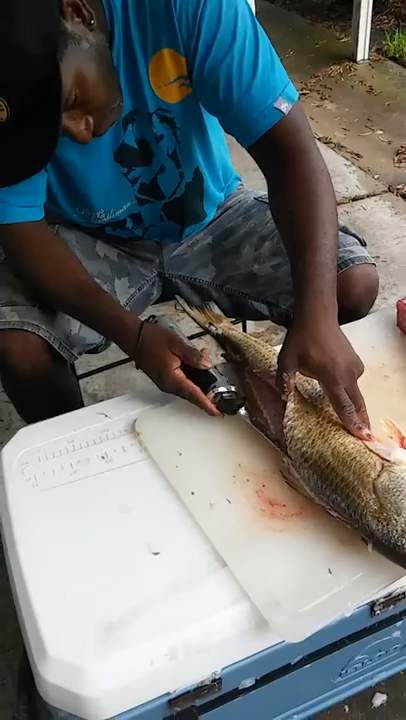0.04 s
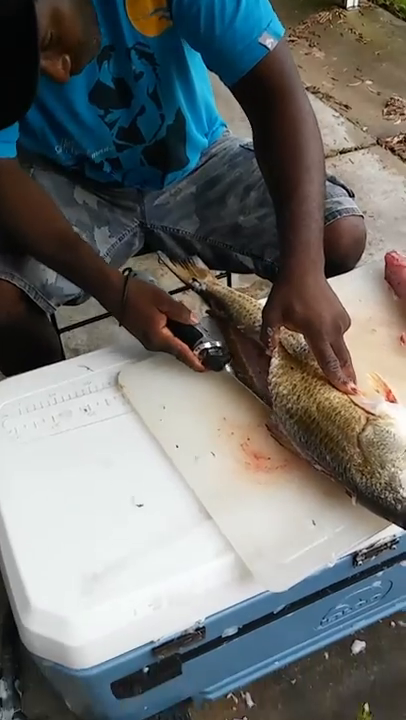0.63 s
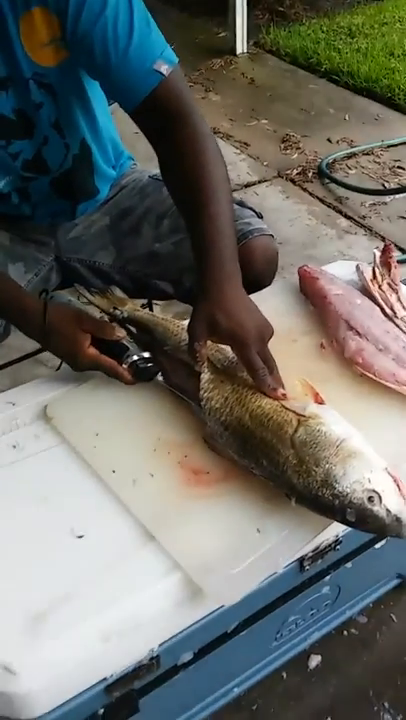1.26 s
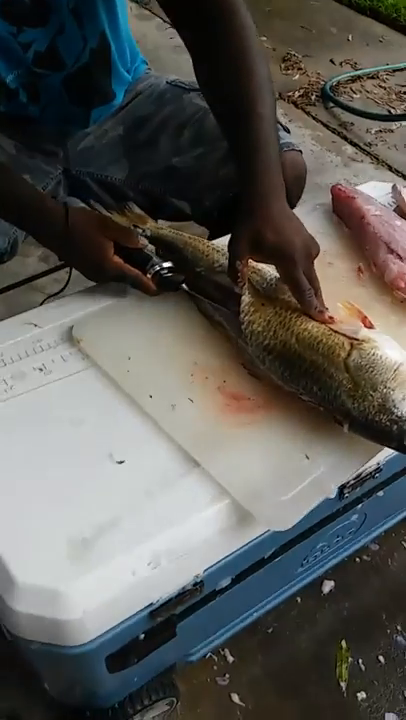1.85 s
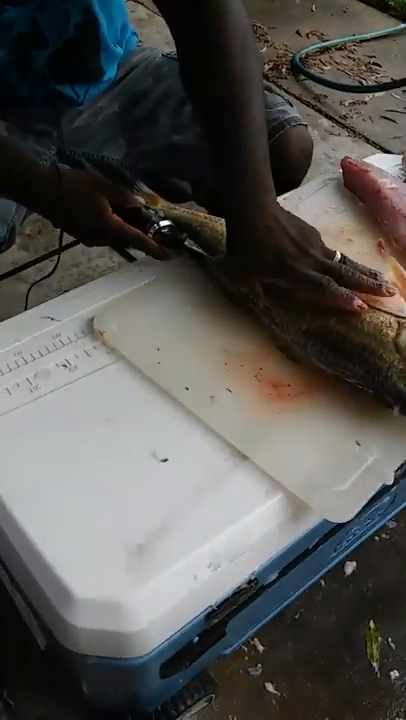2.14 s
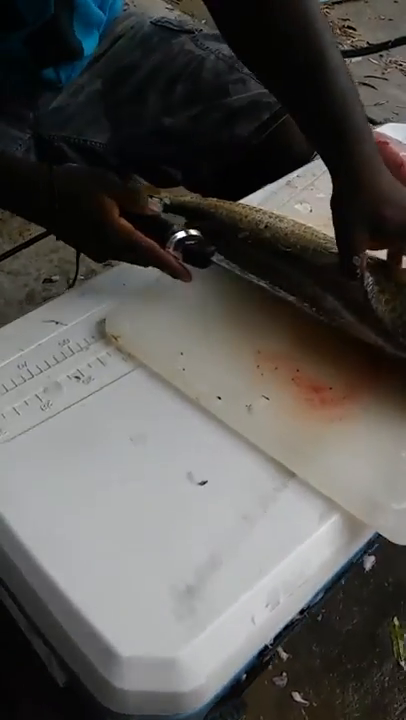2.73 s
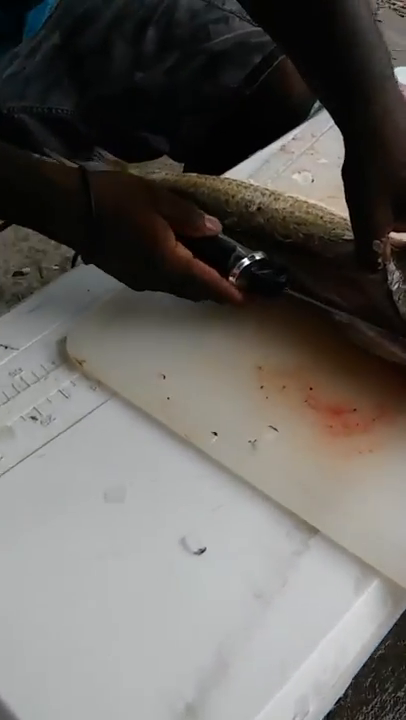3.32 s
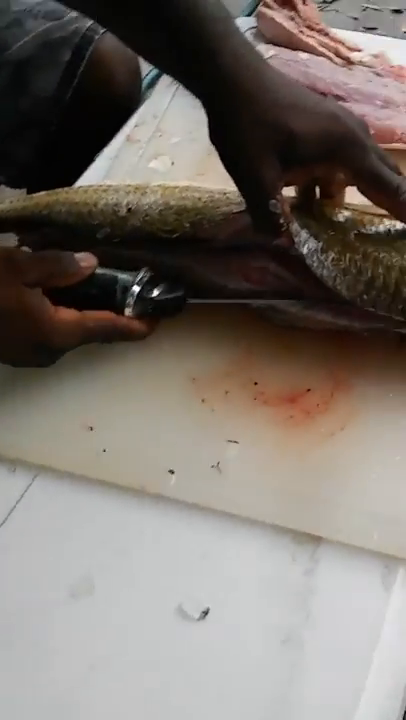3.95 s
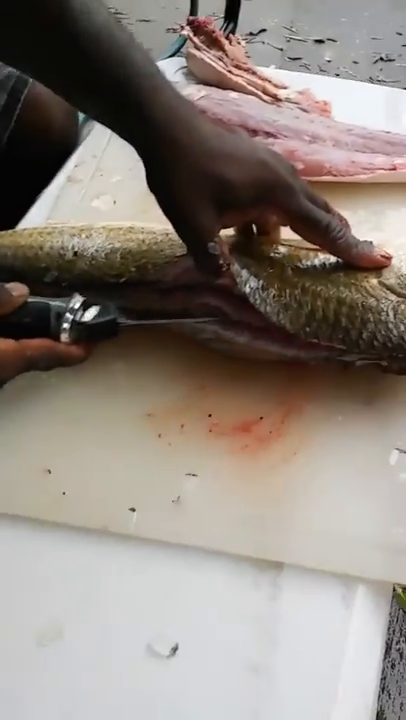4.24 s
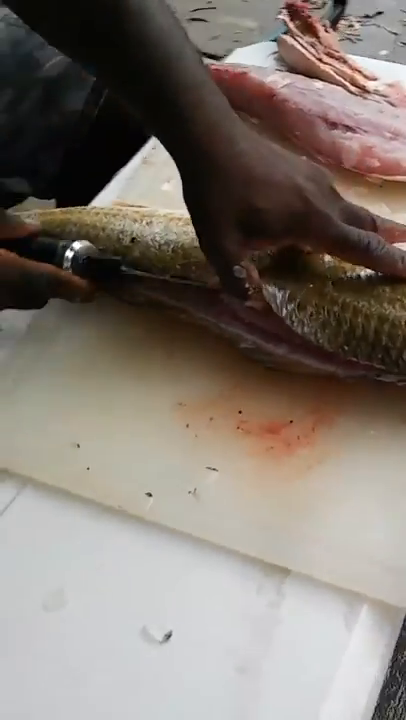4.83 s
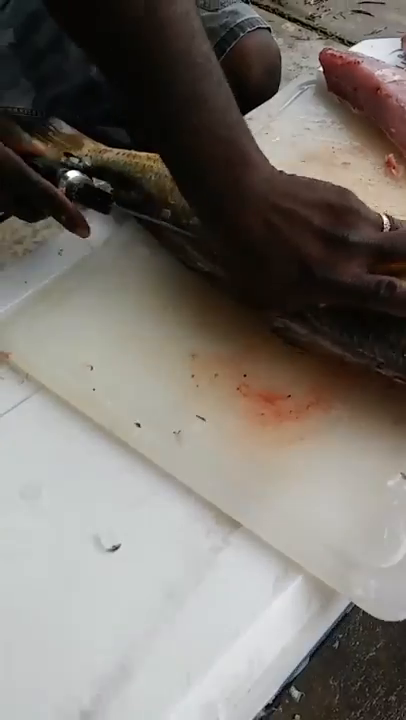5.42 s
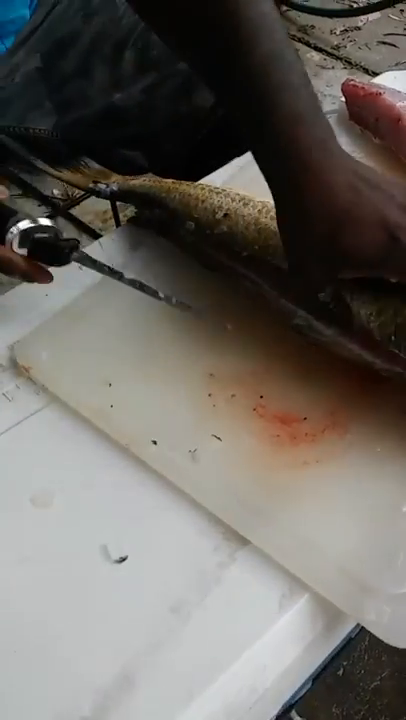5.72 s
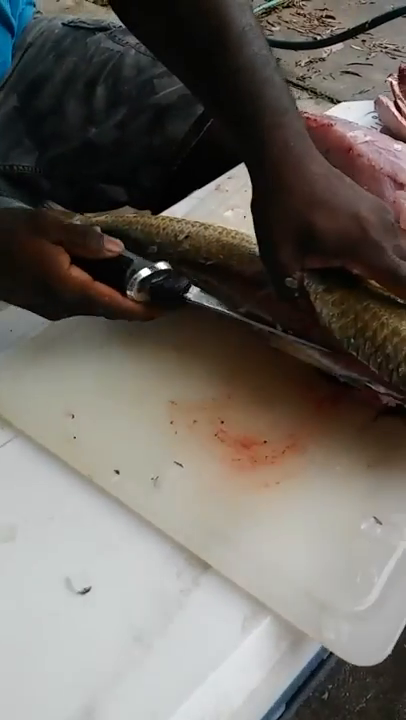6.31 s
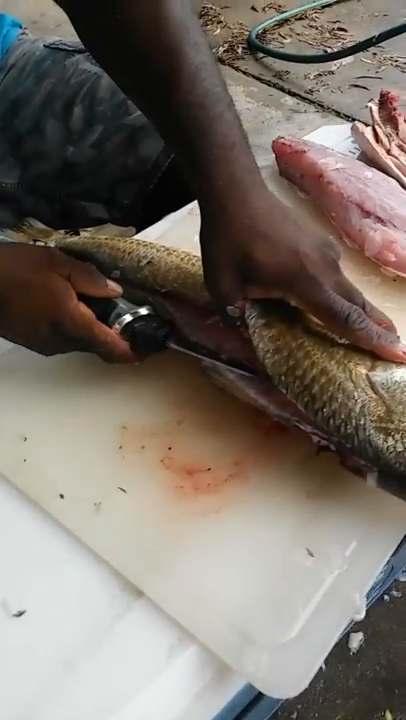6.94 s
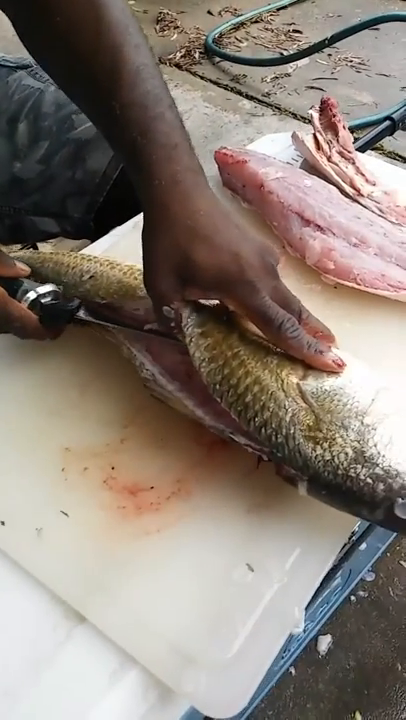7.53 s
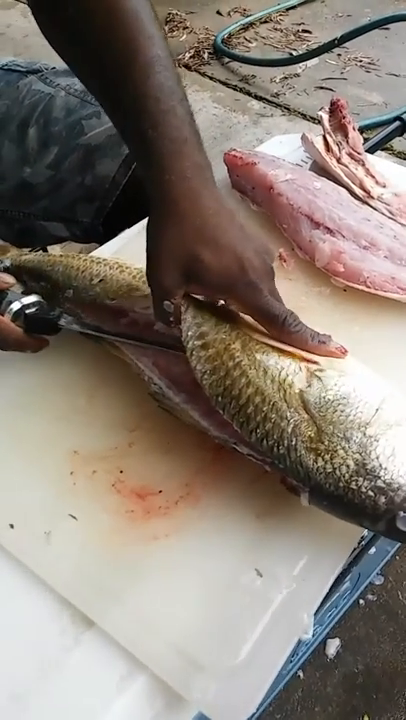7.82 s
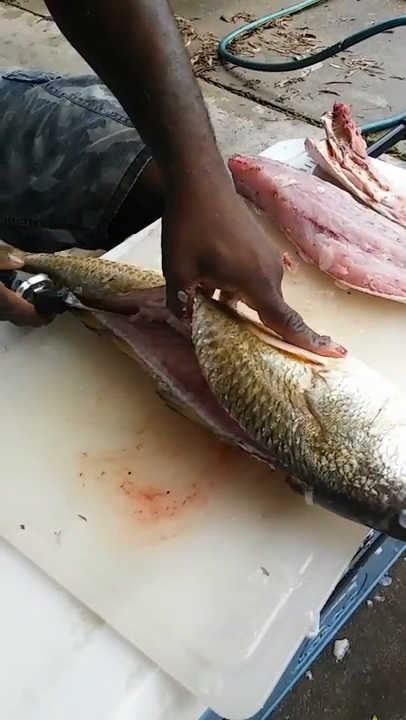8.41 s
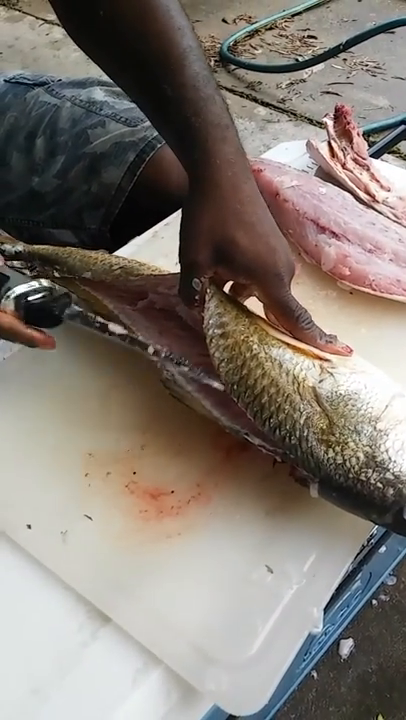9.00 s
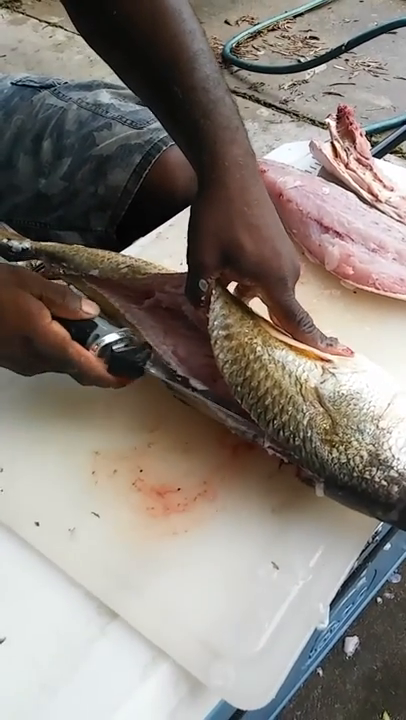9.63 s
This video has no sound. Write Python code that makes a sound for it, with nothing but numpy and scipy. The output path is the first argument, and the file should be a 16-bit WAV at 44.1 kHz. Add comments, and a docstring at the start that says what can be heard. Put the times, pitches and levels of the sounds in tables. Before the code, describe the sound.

Close by, an electric knife spins up and cuts a fish, its steel blades clattering and thumping a plastic board over grinding gears. It buzzes in three bursts, each coasting down, and the last speeds up midway. In the pauses come wet crackles, ticking scales, a small squeak and a sharp bump on the board. A low outdoor rumble and faint drone lie underneath.

```python
"""An electric fillet knife cuts a fish on a plastic board outdoors, over a low rumble and drone. Wet handling
and faint chirps come first. At 0.5 s the motor spins up: at each reversal the twin blades clatter, shake the
housing and thump the board; gears grind in between. It coasts down, scales tick, steel squeaks on skin and the
knife handle bumps the lid. A second cut starts at 3.8 s; a wet pop, ticks and crackles follow. The third starts
at 6.8 s, speeds up and coasts down; the motor kicks again at the very end."""
import sys
import numpy as np
from scipy import signal
from scipy.fft import rfft, irfft
from scipy.io import wavfile
from scipy.ndimage import uniform_filter1d

SR = 44100
rng = np.random.default_rng(int(sys.argv[2]) if len(sys.argv) > 2 else 0)


def dump(signal):
    """Clip the signal to [-1, 1] and save it as 16-bit WAV at the path in sys.argv[1]."""
    limited = np.clip(np.atleast_2d(signal).T, -1, 1)
    pcm = np.round(limited * 32767).astype(np.int16)
    wavfile.write(sys.argv[1], SR, pcm)


N = 426006

# Motor runs. Each row: trigger press and release in seconds, first and full stroke rate in Hz,
# creep in Hz/s, spin-up and drag time constants in seconds, friction in Hz/s.
MOTOR_RUNS = [(.484, 2.105, 20.2, 61.123, -.741, .1635, 2.061, 28.66),
              (3.7514, 4.881, 23.5, 58.55, 3.804, .1693, .5963, 6.7),
              (6.7613, 8.671, 20.53, 64.388, -3.389, .2096, 1.3125, 15.69)]
# Base levels per run. Each row: blade, housing and board level in dB.
RUN_LEVELS_DB = [(-32.5, -32, -44.5), (-29, -28.5, -36.5), (-24, -30.5, -37.5)]
# Strongest modes per run. Each row: blade level and its change after release in dB, housing pitch in Hz,
# housing level in dB, board pitch pressed and free in Hz, board level in dB, board decay in seconds.
RUN_MODES = [(-4.5, 0, 2600, -3.5, 900, 865, -3, .005), (-4.5, -1, 2330, 0, 750, 900, -5.5, .0018),
             (-2.5, -8, 2490, -3.5, 830, 680, -11, .0022)]
# Blade mode, shifted by bending and the grip of the flesh. Each row: time in seconds, pitch in Hz.
BLADE_PITCH = [(.5, 4400), (1.3, 4500), (1.9, 4700), (2.15, 4950), (2.65, 4480), (3.8, 4700), (4.6, 4800),
               (4.85, 5150), (5.0, 4550), (5.4, 4850), (6.8, 4550), (7.3, 4600), (7.7, 4900), (8.4, 4700),
               (8.8, 4900), (9.401, 4750)]
# Blades bite on bone and scales; the last row hushes them as the motor stalls.
# Each row: centre and half length in seconds, blade, housing and board gain in dB.
BITES = [(0.89, 0.15, 1.3, 5, 3), (1.59, 0.39, 2, 7.5, 2), (2.53, 0.59, 9, 3, 14),
         (4.336, 0.54, 4.5, 4.5, -0.5), (4.85, 0.091, 6.5, -0.5, 9), (4.998, 0.097, 2.5, 0, 6),
         (5.179, 0.18, 4, 1.7, 8.5), (5.38, 0.063, -0.5, 5.5, 3.5), (7.865, 0.25, 6.5, 4.5, 6),
         (8.602, 0.056, 5, 3, 1.5), (8.968, 0.24, 4, 7.5, 5), (9.446, 0.36, 4.5, 11.5, 10),
         (9.562, 0.021, -10, -9, 7)]
# Responses per run; they shift with grip and cut depth. Each row: frequency in Hz, gain in dB.
BLADES_1 = [(1880, -44), (3200, -8.5), (3660, -6), (4630, 2.5), (5750, -1.5), (6360, -2.5), (6990, -5.5),
            (8160, -5.5), (9530, -17), (13300, -14), (14300, -21), (15500, -39), (16000, -44)]
BLADES_2 = [(1880, -35), (3200, -23.5), (3970, -6.5), (4420, 1.5), (5630, -0.5), (6490, -3), (7630, -4.5),
            (8910, -12.5), (10600, -20.5), (13300, -16), (15000, -32), (16000, -66)]
BLADES_3 = [(1880, -56), (3200, -21), (3640, -13), (4450, 2), (4760, 1), (5270, -0.5), (5750, -5),
            (7580, -6.5), (10100, -26), (13300, -18.5), (15100, -39), (16000, -45)]
HOUSING_1 = [(650, -48), (1100, -25), (1280, -29), (1470, -3), (1620, -14.5), (1750, -13), (1940, -6),
             (2120, -6), (2550, 2.5), (2870, -2.5), (3700, -13.5), (4810, -15), (8140, -120)]
HOUSING_2 = [(650, -60), (1100, 1), (1170, 2), (1320, -17), (1420, 3.5), (1500, 2), (1690, -6.5),
             (1890, 4.5), (2050, -2), (2230, 1), (2770, 5), (3230, -4), (3700, -5), (4810, -3.5),
             (8140, -120)]
HOUSING_3 = [(650, -16.5), (1100, -54), (1290, -4.5), (1510, -2.5), (1680, -4), (2070, -3.5), (2430, 2.5),
             (3190, -1), (3700, -5), (4810, -6.5), (8140, -120)]
BOARD_1 = [(190, -84), (330, -11.5), (377, -26), (438, -15.5), (655, -21.5), (749, -8.5), (885, -4),
           (1100, -17.5), (1250, -14), (1620, -12), (2750, -120)]
BOARD_2 = [(190, -52), (330, -13), (357, -23), (527, -3), (659, -1.5), (774, 3), (1000, -2.5), (1160, -8.5),
           (1250, -4.5), (1620, -22), (2750, -120)]
BOARD_3 = [(190, -22), (330, -26), (377, -6.5), (570, -7.5), (623, -1), (805, 0.5), (920, 2), (1100, -2),
           (1250, -6.5), (1620, -20), (2750, -120)]
# Spectra of the other sounds. Each row: frequency in Hz, gain in dB.
LOOSE_HOUSING = [(650, -40), (1170, -30), (1440, -4), (1750, -10), (2200, 1), (2750, 0), (3400, -6),
                 (4700, -7), (8140, -120)]
TICK_COLOUR = [(3000, -41), (6000, 6), (8000, 0.5), (10000, -0.5), (13000, -2.5), (14500, -14), (16000, 1)]
SIZZLE_COLOUR = [(6000, -43), (11000, -10.5), (13300, 6), (15000, -9), (16000, -26.5)]
CLUNK_COLOUR = [(300, -15), (650, -3), (850, -14), (1120, 0), (1400, 0), (1900, 1), (2350, -9), (3100, 0),
                (4600, -6), (6000, -12), (7400, -12), (12900, -24), (15500, -28)]
POP_COLOUR = [(530, -64), (900, -32), (1010, -34), (1180, -23), (1410, -4), (2160, 1), (3000, -7),
              (4500, -44), (5850, -70), (9900, -120)]
RUB_COLOUR = [(200, -32), (400, -12.5), (640, 5), (950, -5), (1350, -2.5), (1800, -8.5), (2300, -8.5),
              (3400, -15.5), (7000, -16), (12000, -24), (16000, -26.5)]
RUMBLE_COLOUR = [(15, -67), (25, -57), (55, -14.5), (236, -1.5), (354, -8.5), (476, -9), (560, -13.5),
                 (911, -19), (1020, -17), (1370, -33), (1560, -21.5), (1840, -34.5), (2000, -24),
                 (12200, -50), (16000, -80)]
# Single knocks, hard strokes and motor starts; the last two are the motor kicking in again.
# Each row: start in seconds, relative blade, housing, board and ping level in dB, contact T60 in seconds.
KNOCKS = [(.484, -40, -37, -33.5, -38, 0.034), (1.363, -20.5, -20, -46, -19, 0.011),
          (2.475, -36, -41, -54, -19, .017), (2.635, -25, -48, -60, -12, .027),
          (2.702, -33, -51, -55, -19, 0.016), (2.94, -26.5, -46, -52, -21, 0.025),
          (3.057, -34, -58, -51, -32, 0.015), (3.124, -36.5, -46, -48, -28, .028),
          (3.225, -40, -60, -45, -33, .02), (3.286, -58, -58, -44.5, -45, 0.058),
          (3.627, -47, -52, -41, -34, .021), (3.675, -32.5, -58, -51, -34, 0.0064),
          (3.743, -32, -41, -48, -30, 0.031), (3.751, -26.5, -30.5, -29, -20, 0.024),
          (4.806, -26, -21, -26, -14, .013), (4.837, -26, -26, -29, -9, 0.012),
          (4.995, -32, -34, -33, -20, .016), (5.035, -25, -22, -35, -7, .016),
          (5.372, -34.5, -44, -36, -32, 0.082), (5.459, -33, -33, -44, -25, 0.049),
          (5.7, -38, -38, -63, -34, 0.012), (5.784, -38.5, -43.5, -67, -40, 0.02),
          (5.924, -46.5, -55, -61, -45, 0.037), (6.294, -68, -66, -41, -70, 0.026),
          (6.457, -39, -64, -61, -25, .019), (6.572, -30, -70, -53, -22, 0.025),
          (6.654, -35, -46, -41, -16.5, .024), (6.706, -32, -57, -54, -34, .013),
          (6.757, -35, -35, -27.5, -24, .021), (7.645, -16, -41, -36.5, -3, 0.016),
          (7.753, -18, -34, -42, -4, .018), (8.095, -20, -26, -44, -12, .016),
          (8.549, -19, -30, -38, -11, .013), (8.595, -22, -28, -38, -10, .01),
          (9.044, -23, -24.5, -41, -10, .015), (9.221, -29, -34, -52, -18, 0.018),
          (9.394, -23, -27, -42, -20, .031), (9.532, -20.5, -34, -55, -20, 0.0054),
          (9.623, -35, -39, -40, -36, 0.11), (9.653, -29.5, -33, -31.5, -26, .033)]
# Bright ticks of scales and of the snapping blade, and wet pops. Each row: start in seconds, relative level in
# dB.
SCALE_TICKS = [(3.246, -22), (3.286, -25), (3.2984, -31), (3.306, -28), (3.449, -29.5), (3.482, -33),
               (3.6285, -29), (3.674, -20), (5.5563, -24), (5.62, -27), (5.756, -25.5), (6.039, -41),
               (6.186, -37), (6.4582, -25), (6.572, -24)]
POPS = [(5.7436, -19.5)]
# Gliding tones. Each row: centre and half length in seconds, pitch in Hz, glide in Hz/s, level in dB.
RASPS = [(4.67, .1, 520, 400, -39), (8.6, .055, 4700, -7000, -20.5), (8.81, .07, 2780, -1500, -31),
         (8.97, .1, 2300, -2500, -28.5)]
WHINES = [(.85, 0.32, 4400, -0.5, -45), (1.0, 0.34, 6300, 2, -40.5), (1.4, 0.38, 1507, 42, -43),
          (5.03, 0.24, 1470, -0.5, -38.5), (4.36, 0.28, 1187, 151.5, -37), (7.45, 0.34, 11000, -1, -45)]
DRONES = [(1.8, 1, 224, 10.5, -49), (3.54, 0.35, 257.2, 0, -45.5), (6.2, 0.52, 170, 0, -53.5),
          (3.8, 0.44, 150, 0.5, -52.5), (9.5, 0.87, 140, 0, -56.5)]
CHIRPS = [(.11, 0.051, 1370, -2000, -44.5), (.215, 0.042, 1330, 996, -46), (.27, 0.043, 2270, -3000, -49),
          (.37, .018, 1320, -4, -49)]
# Noise swells. Each row: centre and half length in seconds, relative level in dB.
SIZZLE_SWELLS = [(1.0, .2, -46), (2.25, 0.2, -47), (4.95, .14, -49), (7.85, 0.34, -37), (8.6, 0.094, -37),
                 (8.88, 0.16, -39)]
HANDLING_SWELLS = [(.1, 0.15, -53), (.42, 0.16, -38), (3.42, 0.1, -60), (3.65, 0.11, -38.5),
                   (5.14, 0.05, -25), (5.55, 0.17, -69), (5.89, 0.041, -42), (6.38, 0.13, -55)]
RUMBLE_SWELLS = [(.1, 0.5, -41), (1.3, 0.99, -45), (3.55, 0.35, -49), (4.8, 1, -49), (5.95, 0.21, -54.5),
                 (6.9, 0.51, -56)]

STALL_HZ, REFERENCE_HZ = 11, 60  # stroke rates: blades stick; base levels hold
SPEED_DB_PER_OCTAVE, EASE_DB_PER_S = (5.5, 7, -0.5), (5, 10.5, 28.5)  # blades, housing, board


def knife(bite_db, run, levels_db, modes, blades, housing, board, relax_s=0.28):
    """One run: clatter and grinding drive blades, housing and board; the hand eases off after release."""
    (blade_mode_db, blade_damp_db, housing_hz, housing_mode_db,
     pressed_hz, free_hz, board_mode_db, board_decay_s) = modes
    rate_hz, coast_s = motor(*run)
    strokes = np.cumsum(rate_hz) / SR
    octaves = np.log2(np.maximum(rate_hz, STALL_HZ) / REFERENCE_HZ)
    loose_db = -2 - 0.59 * bite_db[0]  # a bite tightens the clatter and lessens the grinding
    relaxed = 1 - np.exp(-coast_s / relax_s)
    # Steel answers at once; housing and board take longer.
    clack = clatter(rate_hz, loose_db, spread=.135, scatter_db=.9, limp_db=1, decay_s=.0009, count=18)
    ping = clatter(rate_hz, loose_db, spread=.09, scatter_db=.8, limp_db=.8, decay_s=.0014, count=5)
    shake = clatter(rate_hz, loose_db, spread=.19, scatter_db=1.1, limp_db=2, decay_s=.0008, count=9)
    sway = clatter(rate_hz, loose_db, spread=.15, scatter_db=1.2, limp_db=1,
                   decay_s=board_decay_s, count=9)
    touch = clatter(rate_hz, loose_db, spread=.13, scatter_db=3.8, limp_db=1.8, decay_s=.0003, count=2)
    grind = gears(rate_hz)
    grind_gain = undb(loose_db + 3.5 * octaves * (coast_s > 0))
    running = uniform_filter1d(1. * (rate_hz > 0), size=200) * judder()

    def part(hits, colour, level_db, grind_db, mode=0, mode_gain=0, loose_colour=None):
        """Contacts and grinding rattle one part; its mode rings on top."""
        grind_share = (grind_gain * undb(grind_db)) ** 2
        force = np.sqrt(hits + grind_share * grind) * rng.standard_normal(N)
        rattle = resonate(force, colour)
        if loose_colour is not None:
            rattle = (1 - relaxed) * rattle + relaxed * resonate(force, loose_colour)
        norm = np.sqrt(1 + grind_share + mode_gain ** 2)
        return (rattle + mode_gain * mode) / norm * undb(level_db) * running

    blade_db, housing_db, board_db = (
        base + rise * octaves - ease * coast_s + bite
        for base, rise, ease, bite in zip(levels_db, SPEED_DB_PER_OCTAVE, EASE_DB_PER_S, bite_db))
    blade_hz = np.interp(np.arange(N) / SR, *np.transpose(BLADE_PITCH))
    blade_mode = struck(ping, strokes, blade_hz, detune=.04, uneven_db=1, stray=.028, droop=.3)
    overtone = undb(-11.5) * struck(ping, strokes, hz=6960, detune=.1, uneven_db=7.5, stray=.035)
    blade_ring = undb(blade_mode_db + 0.57 * bite_db[0] + blade_damp_db * relaxed)
    # After release the housing rings lower and weaker, the board hollower.
    sagging_hz = housing_hz * (1 - .14 * relaxed)
    housing_mode = struck(ping, strokes, sagging_hz, detune=.035, uneven_db=1.5, stray=.025)
    housing_ring = undb(housing_mode_db + bite_db[1] - 16 * relaxed)
    board_hz = pressed_hz + (free_hz - pressed_hz) * relaxed
    board_mode = struck(sway, strokes, board_hz, detune=.045, uneven_db=1.5, stray=.04)
    board_ring = undb(board_mode_db + 12.5 * relaxed)

    steel = part(clack, blades, blade_db, grind_db=3.5, mode=blade_mode + overtone, mode_gain=blade_ring)
    shell = part((clack + shake) / 2, housing, housing_db, grind_db=10.5,
                 mode=housing_mode, mode_gain=housing_ring, loose_colour=LOOSE_HOUSING)
    thump = part(sway, board, board_db, grind_db=-4, mode=board_mode, mode_gain=board_ring)
    tick = part(touch, TICK_COLOUR, blade_db - 14, grind_db=-6)  # first touch of steel on steel
    cutting = sizzle(clack + grind / 6) + rasp(ping, strokes, rate_hz)
    return steel + shell + thump + tick + cutting * running


def motor(press_s, release_s, first_hz, full_hz, creep_hz_per_s, spin_up_s, drag_s, friction_hz_per_s,
          surge_s=7.546, surge_rise_s=.25, surge_hz=7.08):
    """Spins up, then coasts against drag and friction. Returns stroke rate and time since release."""
    t = np.arange(N) / SR
    held_s = np.clip(t, press_s, release_s) - press_s
    coast_s = np.maximum(t - release_s, 0)
    surge = np.clip((press_s + held_s - surge_s) / surge_rise_s, 0, 1)  # last run only
    target_hz = full_hz + creep_hz_per_s * held_s + surge_hz * surge
    driven_hz = target_hz + (first_hz - target_hz) * np.exp(-held_s / spin_up_s)
    friction_hz = friction_hz_per_s * drag_s
    rate_hz = (driven_hz + friction_hz) * np.exp(-coast_s / drag_s) - friction_hz
    return rate_hz * ((t >= press_s) & (rate_hz > STALL_HZ)), coast_s


def clatter(rate_hz, loose_db, spread, scatter_db, limp_db, decay_s, count,
            hit_db=5.5, jitter_s=.0004, lead_s=.0012):
    """Power of the blade contacts: a cluster per reversal, longer when slow, tighter when biting."""
    strokes = np.cumsum(rate_hz) / SR
    reversals = np.flatnonzero(np.diff(np.floor(strokes)))[:, None]
    draws = rng.standard_normal((len(reversals), 2 + 2 * count))
    jitter, scatter, offset, strength = np.split(draws, [1, 2, 2 + count], axis=1)
    width_s = spread * undb(0.36 * loose_db[reversals]) / np.maximum(rate_hz[reversals], 26)
    times_s = reversals / SR - lead_s + jitter_s * jitter + width_s * offset
    share = undb(hit_db * strength) ** 2 * np.exp(-offset ** 2 / 2)
    share /= share.sum(axis=1, keepdims=True)
    limp = -(-1) ** np.arange(len(reversals))[:, None]  # every second stroke hits harder
    size = undb(scatter_db * scatter + limp_db * limp) ** 2
    return impacts(times_s, size / size.mean() * share / rate_hz[reversals], decay_s)


def struck(power, strokes, hz, detune, uneven_db, stray, droop=0):
    """A mode rung by the contacts; each stroke has its own pitch and strength, and may droop."""
    draws = rng.standard_normal((N // 500, 2))[np.floor(strokes + 1 / 3).astype(int)]
    size = undb(uneven_db * draws[:, 1]) / undb(uneven_db ** 2 * np.log(10) / 20)  # mean square 1
    stroke_phase = np.clip((strokes + 1 / 3) % 1 - 1 / 3, -1 / 6, 1 / 3)
    pitch_hz = hz * (1 + detune * draws[:, 0] - droop * stroke_phase)
    return np.sqrt(power) * size * tone(pitch_hz, stray, stray_hz=400.3)


def gears(rate_hz, teeth=7, depth=0.39, rough_db=4):
    """Power of the grinding gears: rough, pulsing as the teeth mesh."""
    mesh = 1 + depth * np.cos(2 * np.pi * teeth * np.cumsum(rate_hz) / SR)
    power = mesh * undb(rough_db * wander(900)) ** 2
    return power / power.mean()


def judder(centre_s=1.68, half_s=0.32, hz=9.8, depth_db=2.9):
    """Gain wobble as the knife bounces in the first cut."""
    t = np.arange(N) / SR - centre_s
    return undb(depth_db * np.exp(-(t / half_s) ** 4) * np.cos(2 * np.pi * hz * t))


def rasp(power, strokes, rate_hz):
    """Strokes rasp upward as the blade presses on the board, downward as it withdraws."""
    t = np.arange(N) / SR
    sound = np.zeros(N)
    for centre_s, half_s, hz, glide, db in RASPS:
        if rate_hz[int(centre_s * SR)] > 0:
            pitch_hz = hz + glide * np.clip(t - centre_s, -2 * half_s, 2 * half_s)
            mode = struck(power, strokes, pitch_hz, detune=.025, uneven_db=.5, stray=.035)
            sound += undb(db) * swell(centre_s, half_s) * mode
    return sound


def sizzle(power):
    """A thin, high sizzling ring of the blades, pulsing with the strokes."""
    force = np.sqrt(power) * rng.standard_normal(N)
    return resonate(force, SIZZLE_COLOUR) * swells(SIZZLE_SWELLS, rest_db=-63)


def whine():
    """The blades whine as they saw."""
    return notes(WHINES, stray=0.036, stray_hz=311) * wander(120)


def knocks(tail_db=-19, tail_s=0.065, steel_db=4, shell_db=5, thump_db=3, snap_db=-2.5, stretch=0.043):
    """A sharp contact and a loose rattle ring blades, housing and board; the blade pings."""
    t = np.arange(SR // 5) / SR
    force, pings = np.zeros((3, N + len(t))), np.zeros(N + len(t))
    for start_s, *levels_db, ping_db, t60_s in KNOCKS:
        fade = undb(-60 * t / t60_s) + undb(tail_db) * np.exp(-t / tail_s)
        at = int(start_s * SR)
        force[:, at:at + len(t)] += undb(levels_db)[:, None] * fade * rng.standard_normal((3, len(t)))
        stretched_s = t * np.exp(stretch * rng.standard_normal())
        pings[at:at + len(t)] += undb(ping_db + snap_db) * snap(stretched_s)
    steel = undb(steel_db) * resonate(force[0, :N], BLADES_2)
    shell = undb(shell_db) * resonate(force[1, :N], HOUSING_3)
    thump = undb(thump_db) * resonate(force[2, :N], BOARD_3)
    return pings[:N] + steel + shell + thump


def snap(t, top_hz=13000, low_hz=3550, sweep_s=0.000398, decay_s=0.0042, rise_s=0.00043):
    """Bending wave in the thin blade: treble arrives first, so the ping falls."""
    hz = low_hz + (top_hz - low_hz) / (1 + t / sweep_s)
    envelope = (1 - np.exp(-t / rise_s)) * np.exp(-t / decay_s)
    return envelope * np.sin(2 * np.pi * np.cumsum(hz) / SR)


def clunk(start_s=3.5468, level_db=-18.5, blow_s=0.0026, tail_db=-14, tail_s=0.05):
    """The knife handle bumps the cooler lid: a hard plastic clack, then a short clatter of the lid."""
    age_s = np.maximum(np.arange(N) / SR - start_s, 0)
    envelope = (age_s > 0) * (np.exp(-(age_s / blow_s) ** 2) + undb(tail_db) * np.exp(-age_s / tail_s))
    return undb(level_db) * resonate(envelope * rng.standard_normal(N), CLUNK_COLOUR)


def pops(gain_db=3):
    """A wet pocket snaps open with a single pulse."""
    pulses = np.zeros(N)
    for start_s, db in POPS:
        pulses[int(start_s * SR)] = undb(db)
    sound = resonate(pulses, POP_COLOUR)
    return undb(gain_db) * sound * pulses.max() / np.abs(sound).max()


def scales(gain_db=-5, decay_s=.0007):
    """Wet scales flick off the steel, and the blade snaps, each with one bright tick."""
    times_s, levels_db = np.transpose(SCALE_TICKS)
    power = impacts(times_s, undb(levels_db) ** 2 * decay_s, decay_s)
    return undb(gain_db) * resonate(np.sqrt(power) * rng.standard_normal(N), TICK_COLOUR)


def flesh(rub_gain=0.3, crackle_db=-15.5, count=900, scatter_db=6.5):
    """Hands and resting blades shift in the flesh: bright wet crackles over duller rubbing."""
    energy = undb(scatter_db * rng.standard_normal(count)) ** 2
    power = impacts(rng.random(count) * N / SR, energy, decay_s=0.00078)
    crackle = resonate(np.sqrt(power / power.mean()) * rng.standard_normal(N), TICK_COLOUR)
    rubbing = resonate(rng.standard_normal(N), RUB_COLOUR) * undb(0.73 * wander(20))
    return swells(HANDLING_SWELLS, rest_db=-51) * (rub_gain * rubbing + undb(crackle_db) * crackle)


def squeak(centre_s=3.295, half_s=0.057, level_db=-42, hz=6800, rough_db=8):
    """Steel slips unevenly out of wet skin."""
    slips = undb(rough_db * np.tanh(wander(200))) * rng.standard_normal(N)
    slips /= np.sqrt(np.mean(slips ** 2))
    colour = [(hz * 0.82, -45), (hz * 0.93, -12), (hz, 0), (hz * 1.1, -12), (hz * 2, -35)]
    return resonate(slips, colour) * undb(level_db) * swell(centre_s, half_s)


def patio(x, echo_db=-15, t60_s=0.15, gap_s=0.0023):
    """Adds weak reflections from lid, ground and house."""
    t = np.arange(SR // 3) / SR
    echoes = rng.standard_normal(len(t)) * undb(-60 * t / t60_s) * (t > gap_s)
    return x + undb(echo_db) * signal.oaconvolve(x, echoes / np.linalg.norm(echoes))[:N]


def outdoors(flutter_db=1.7, rumble_gain_db=-0.5, drone_gain_db=0.5):
    """Low rumble that swells and flutters, a wavering drone, far-off chirps."""
    rumble = resonate(rng.standard_normal(N), RUMBLE_COLOUR) * swells(RUMBLE_SWELLS, rest_db=-49.5)
    rumble *= undb(rumble_gain_db + flutter_db * wander(14))
    drone = notes(DRONES, stray=0.0925, stray_hz=110.1) * wander(80) * undb(drone_gain_db)
    chirps = notes(CHIRPS, stray=0.047, stray_hz=357) * wander(153)
    return rumble + drone + chirps


def resonate(x, colour, size=2048):
    """Passes x through a minimum-phase body of unit energy, given as (Hz, dB) points."""
    hz, db = np.transpose(colour)
    bins_hz = np.arange(size // 2 + 1) * SR / size + 1
    gain = undb(np.interp(np.log(bins_hz), np.log(hz), db))
    gain *= np.minimum(bins_hz / hz[0], 1)  # too small to radiate below its lowest point
    cepstrum = irfft(np.log(gain))
    cepstrum[1:size // 2] *= 2
    cepstrum[size // 2 + 1:] = 0
    response = irfft(np.exp(rfft(cepstrum)))
    return signal.oaconvolve(x, response / np.linalg.norm(response))[:len(x)]


def impacts(times_s, energy, decay_s):
    """Power envelope of exponentially decaying impacts."""
    hits = np.bincount(np.clip(times_s * SR, 0, N - 1).astype(int).ravel(), energy.ravel(), N)
    pole = np.exp(-1 / (decay_s * SR))
    return signal.lfilter([1 - pole], [1, -pole], hits * SR + 1e-18)


def notes(rows, stray, stray_hz):
    """Wavering notes that swell, glide and fade."""
    t = np.arange(N) / SR
    return sum(undb(db) * swell(centre_s, half_s) * tone(hz + glide * (t - centre_s), stray, stray_hz)
               for centre_s, half_s, hz, glide, db in rows)


def tone(hz, stray, stray_hz):
    """Sine of rms 1; its pitch wanders by the fraction stray, at the rate stray_hz."""
    return np.sqrt(2) * np.sin(2 * np.pi * np.cumsum(hz * (1 + stray * wander(stray_hz))) / SR)


def swell(centre_s, half_s):
    """Gaussian rise and fall, peak 1."""
    distance = (np.arange(N) / SR - centre_s) / half_s
    return np.exp(-distance ** 2) * (np.abs(distance) < 4)


def swells(rows, rest_db):
    """Gain of a steady level plus swells, summed in power."""
    power = sum((undb(db) * swell(centre_s, half_s)) ** 2 for centre_s, half_s, db in rows)
    return np.sqrt(undb(rest_db) ** 2 + power)


def wander(hz):
    """Random curve with hz knots a second, spread near 1."""
    knots = rng.standard_normal(N // 20)
    return np.sqrt(3 / 2) * np.interp(np.arange(N) / SR * hz, np.arange(len(knots)), knots)


def undb(db):
    """Decibels to gain."""
    return 10 ** (np.asarray(db) / 20)


def scene():
    """Three cuts with handling between them, over the outdoor background; mono."""
    bodies = [(BLADES_1, HOUSING_1, BOARD_1), (BLADES_2, HOUSING_2, BOARD_2),
              (BLADES_3, HOUSING_3, BOARD_3)]
    bite_db = sum(np.array(gains_db)[:, None] * swell(centre_s, half_s)
                  for centre_s, half_s, *gains_db in BITES)
    cuts = sum(knife(bite_db, run, levels_db, modes, *parts)
               for run, levels_db, modes, parts in zip(MOTOR_RUNS, RUN_LEVELS_DB, RUN_MODES, bodies))
    near = cuts + whine() + knocks() + clunk() + pops() + scales() + flesh() + squeak()
    return (patio(near) + outdoors())[None]


def record(dry, bass_hz=48, clip_level=.92, top_hz=15800):
    """Drops the deep bass, clips the peaks, cuts the top."""
    highpass = signal.butter(2, bass_hz, "highpass", fs=SR, output="sos")
    lowpass = signal.ellip(10, .2, 80, top_hz, fs=SR, output="sos")
    clipped = np.clip(signal.sosfilt(highpass, dry), -clip_level, clip_level)
    return signal.sosfilt(lowpass, clipped)


dry = scene()
out = record(dry)
dump(out)
```